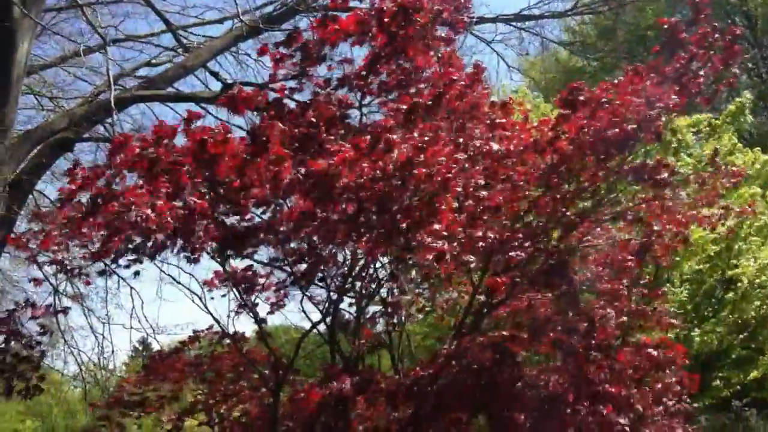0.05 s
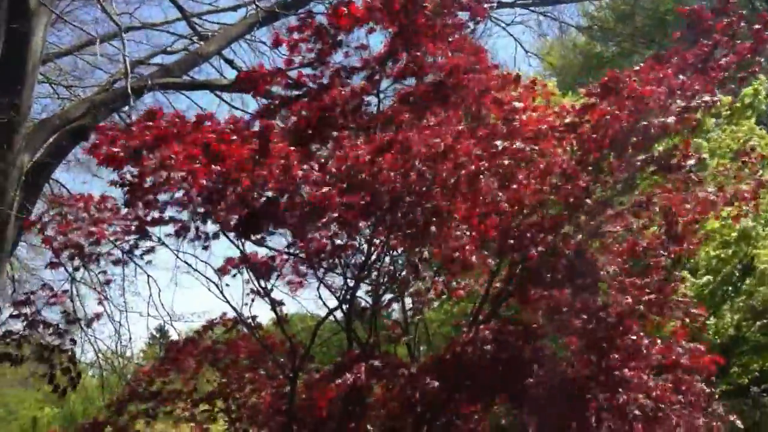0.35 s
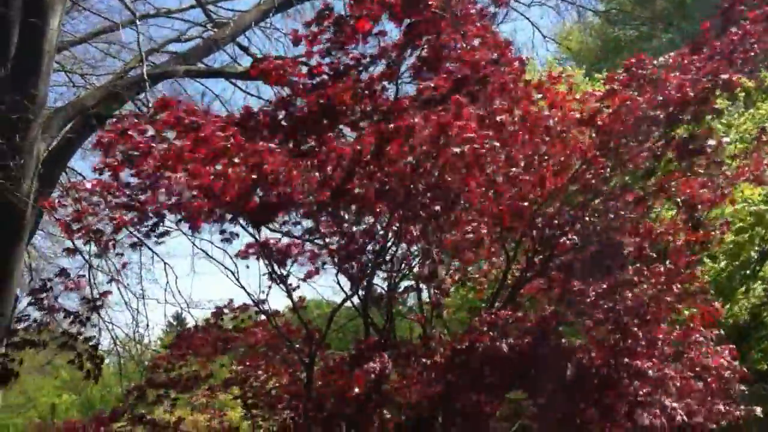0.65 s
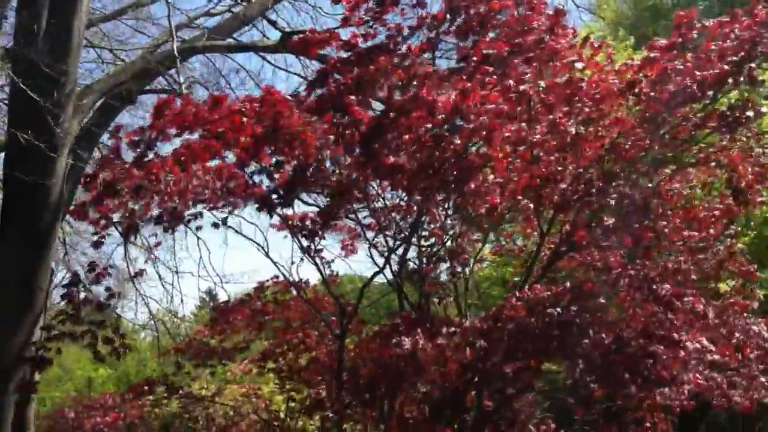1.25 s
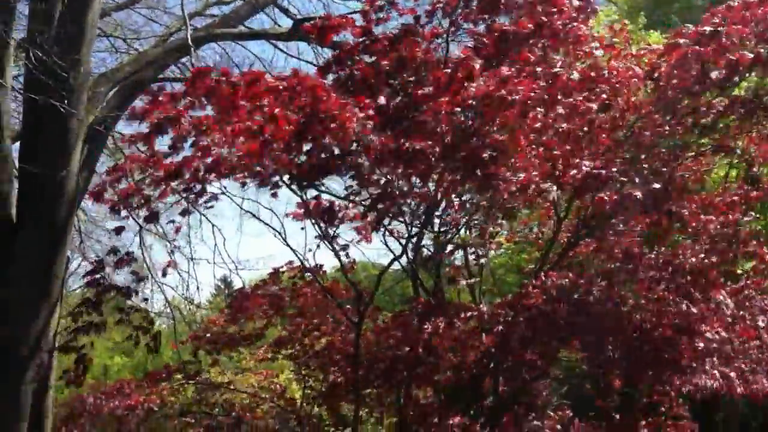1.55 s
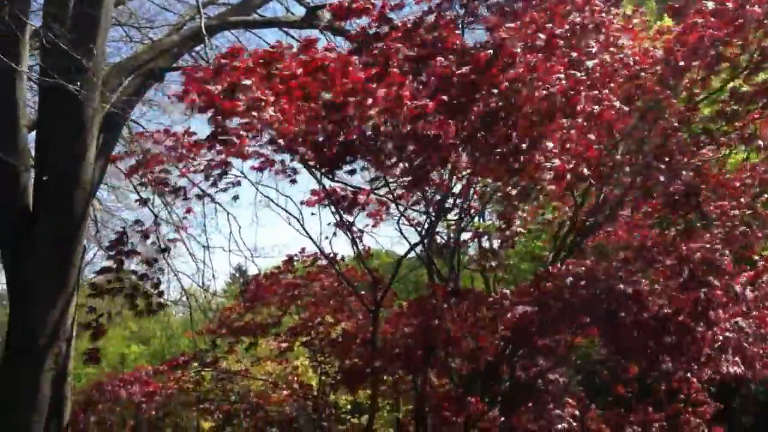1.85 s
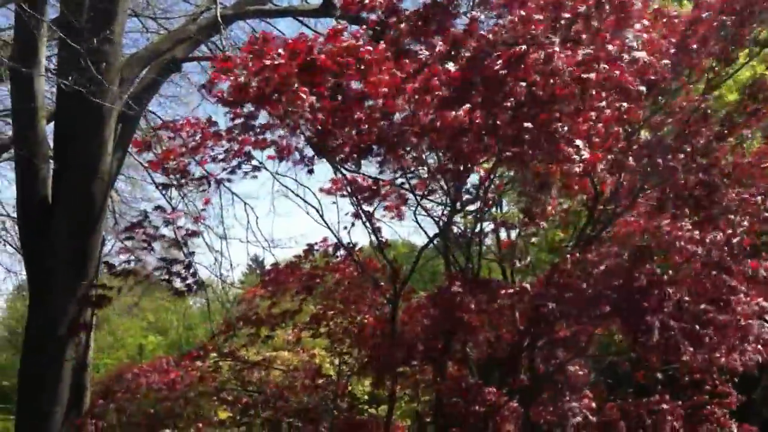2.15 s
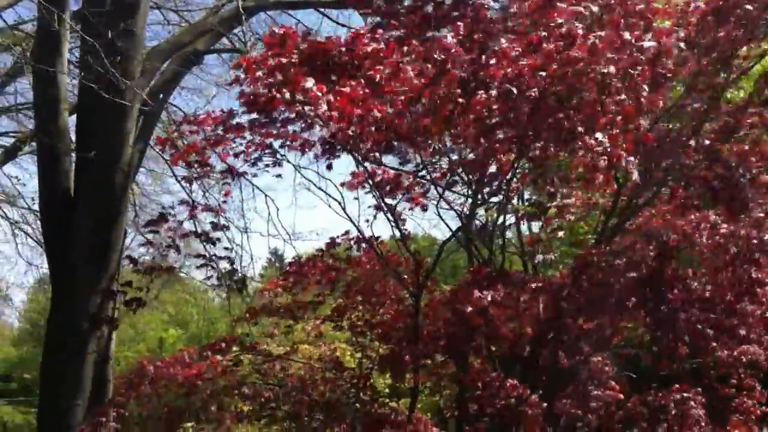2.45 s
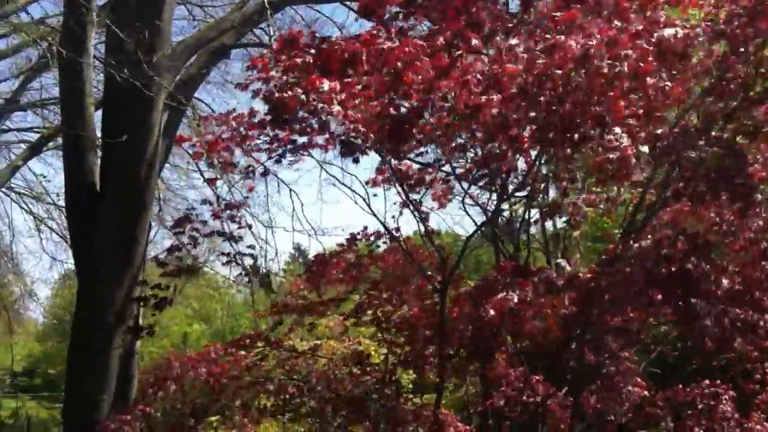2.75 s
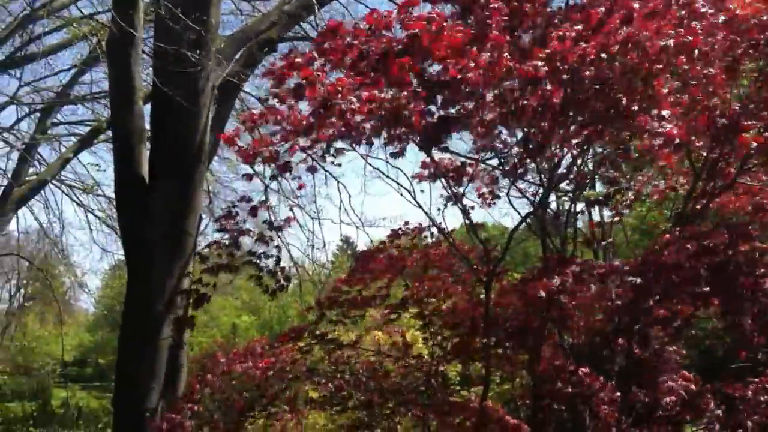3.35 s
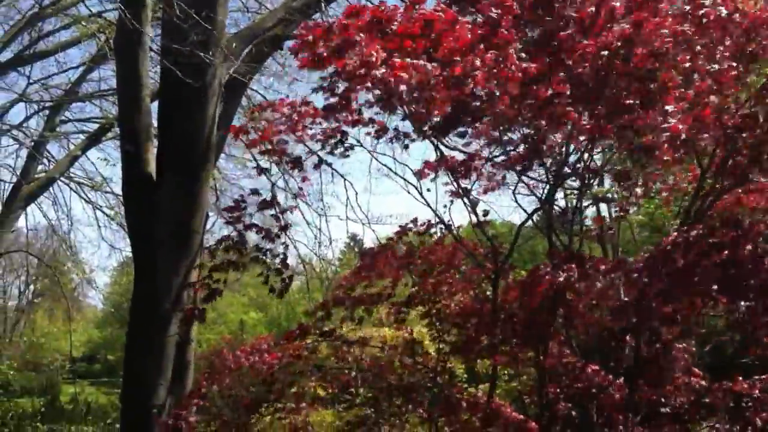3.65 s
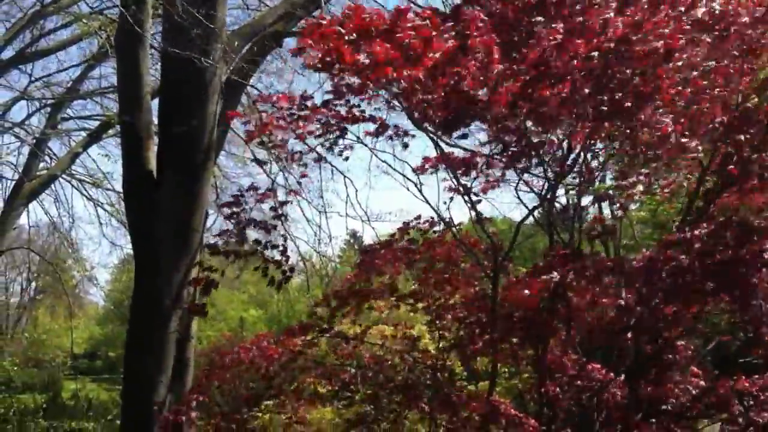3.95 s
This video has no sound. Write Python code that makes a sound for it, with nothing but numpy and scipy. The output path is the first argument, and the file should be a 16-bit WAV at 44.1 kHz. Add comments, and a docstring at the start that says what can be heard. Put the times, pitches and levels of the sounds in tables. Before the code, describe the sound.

Wind rumbles and thumps on the microphone beside a tree, easing into soft puffs.

```python
"""Wind buffets a camera's microphone beside a leafy tree: one hard gust, then light puffs.
The flow rumbles in the microphone's port and crackles when it runs fast.
Single eddies strike the port as soft bumps, each a short swirl leading into a pressure kick.
Behind the wind lie a steady distant rush, a thin hiss of leaves and a few faint treble flickers."""
import sys
import numpy as np
from scipy.fft import rfft, irfft, next_fast_len
from scipy.io import wavfile
from scipy.ndimage import map_coordinates

SR = 44100
rng = np.random.default_rng(int(sys.argv[2]) if len(sys.argv) > 2 else 0)


def wrap_up_sound(samples):
    """Save the sound to the file named by the first command line argument, as 16-bit audio."""
    columns = np.atleast_2d(samples).T
    # keep every value between -1 and 1, then stretch to whole-number steps
    tamed = np.clip(columns, -1, 1)
    steps = np.round(tamed * 32767).astype(np.int16)
    wavfile.write(sys.argv[1], SR, steps)


N = 176400  # 4 s

# Level ride of the rumble: the hard gust, then the light puffs (time [s], level [dB])
GUST_RIDE = [(0, -32), (.05, -22), (.13, -20.5), (.2, -22), (.3, -16), (.355, -20), (.38, -28),
             (.40, -25.5), (.45, -25.5), (.5, -29), (.565, -45), (.63, -43), (.69, -42), (.75, -33),
             (.785, -40.5), (.85, -33.5), (.89, -46.5), (.965, -37), (1.0, -46.5), (1.2, -57)]
PUFF_RIDE = [(1.6, -58), (1.7, -44.5), (1.82, -46.5), (1.89, -64), (2.0, -45.5), (2.33, -55.5),
             (2.41, -29.5), (2.46, -39), (2.54, -49), (2.65, -38), (2.77, -30.5), (2.83, -46.5),
             (2.97, -41.5), (3.07, -55.5), (3.17, -38), (3.24, -40), (3.33, -57), (3.51, -37.5),
             (3.67, -63), (4, -52)]
# Tone of the boomy rumble and of the midrange crackle (frequency [Hz], relative level [dB])
RUMBLE_TONE = [(20, -34.5), (45, -39), (65, -24), (90, -16), (125, -1), (175, 2.5), (240, -6.5),
               (330, -14.5), (450, -21), (700, -43.5), (1200, -73), (3000, -100)]
CRACKLE_TONE = [(60, -40), (250, -8), (550, 13), (750, -3), (1400, -18), (2100, -36), (2800, -37),
                (6000, -79)]
FLUTTER_DB, FLUTTER_RATE = 3, 40  # quick unevenness of the flow: depth, knots a second
FAST_FLOW_DB, CRACKLE_DB, CRACKLE_SLOPE = -19, -32.5, 4.3  # fast flow, crackle there, dB per dB of flow


def buffeting():
    """The flow rumbles in the port; a crackle grows steeply with its speed."""
    flow_db = curve(GUST_RIDE + PUFF_RIDE)
    rumble = amp(flow_db + FLUTTER_DB * wobble(FLUTTER_RATE)) * noise(RUMBLE_TONE)
    crackle = unit(amp(2.5 * wobble(rate=168.5)) * noise(CRACKLE_TONE))
    crackle_db = CRACKLE_DB + CRACKLE_SLOPE * (flow_db - FAST_FLOW_DB)
    return rumble + amp(crackle_db) * crackle


# Eddy hits on the port; sharper ones sound brighter (time [s], kick peak [dB], sharpness [Hz])
EDDY_HITS = [(.083, -15, 400), (0.094, -8, 330), (0.129, -15, 89), (0.151, -1, 273), (0.178, -14, 258),
             (.222, -10, 398), (.228, -2, 550), (.238, -6.5, 1680), (.247, -8.5, 400), (.264, -4.5, 376),
             (0.276, -11.5, 480), (0.29, -4, 600), (.298, 1.5, 133), (.317, -9.5, 450), (.326, -7.5, 800),
             (.342, -2.5, 370), (0.35, -8.5, 1050), (0.373, -16.5, 160), (.440, -9.5, 200),
             (0.489, -10.5, 170), (0.649, -14.5, 196), (.702, -26.5, 150), (.752, -22, 140),
             (1.80, -29.5, 80), (1.98, -34.5, 80), (2.133, -25, 90), (2.391, -19.5, 183),
             (2.400, -16.5, 122), (2.649, -25, 70), (2.752, -19.5, 129), (2.779, -29, 80),
             (2.98, -26.5, 59), (3.52, -27.5, 109)]
EDDY_KNEE_HZ, SWIRL_LOW_CUT_HZ = 230, 330  # a hit rolls off above the knee; its swirl has no bass
SWIRL_DB, SWIRL_RISE_S, SWIRL_FALL_S = -9.5, 0.0049, 0.0021  # swirl trim against the kick, attack, decay


def eddies():
    """Each eddy is a turbulent swirl that builds up to one pressure kick on the port."""
    out = np.zeros(N)
    for time_s, peak_db, sharp_hz in EDDY_HITS:
        colour = lambda hz: np.exp((EDDY_KNEE_HZ - np.hypot(hz, EDDY_KNEE_HZ)) / sharp_hz) * port(hz)
        impulse = np.arange(N) == round(time_s * SR)
        kick = filtered(impulse, colour)
        churn = rng.standard_normal(N) * swell(time_s, SWIRL_RISE_S, SWIRL_FALL_S)
        swirl = filtered(churn, lambda hz: colour(hz) * hz ** 2 / (hz ** 2 + SWIRL_LOW_CUT_HZ ** 2))
        swirl /= np.linalg.norm(kick)  # cancels the gain that the colour gives to noise
        out += amp(peak_db) * (kick / np.abs(kick).max() + amp(SWIRL_DB) * swirl)
    return out


# The port's EQ on the eddy hits (frequency [Hz], gain [dB])
PORT_EQ = [(200, 0), (340, 0), (560, 1.5), (780, -4.5), (1450, -4), (2150, -8.5), (2750, -15.5),
           (3500, -15.5), (5000, -18)]
PORT_LOW_CUT_HZ, PORT_Q, PORT_HIGH_CUT_HZ = 160, 1.7, 3900


def port(hz):
    """The microphone port's response: a steep ringing bass cut, uneven mids and a soft top."""
    low, high = 1j * hz / PORT_LOW_CUT_HZ, 1j * hz / PORT_HIGH_CUT_HZ
    ringing_cut = low ** 2 / (low ** 2 + low / PORT_Q + 1)
    damped_cut = low ** 2 / (low ** 2 + np.sqrt(2) * low + .5)
    soft_top = 1 / (high ** 2 + np.sqrt(2) * high + 1) ** 2
    return ringing_cut * damped_cut * amp(along(PORT_EQ, hz)) * soft_top


# Tone of the distant bed (frequency [Hz], relative level [dB])
RUSH_TONE = [(20, -43), (45, -28), (80, -7.5), (140, -2), (300, 0), (450, -1.5), (650, -4), (950, -3),
             (1400, -6.5), (1900, -12), (2700, -20.5), (5000, -67)]
RUSH_DB = -46.5


def distant_rush():
    """A steady, dark rush from far off that barely wavers."""
    return amp(RUSH_DB + 0.13 * wobble(rate=6)) * noise(RUSH_TONE)


# Tone of the leaves (frequency [Hz], relative level [dB])
LEAF_TONE = [(500, 3), (2500, -3), (3400, 2), (4200, 0), (5100, 1.5), (6300, -1.5), (8300, -2),
             (10000, -4.5), (12500, -4.5), (15500, -7.5)]
# Level ride of the leaves (time [s], level [dB])
LEAF_RIDE = [(0, -55.5), (.13, -53.5), (.4, -56.5), (1, -54.5), (1.6, -55.5), (2.4, -55), (2.85, -54),
             (3.4, -55), (4, -56)]


def leaf_hiss():
    """Leaves in the wind give a thin hiss with a slight shimmer."""
    return amp(curve(LEAF_RIDE) + 0.36 * wobble(rate=25.4)) * noise(LEAF_TONE)


# Treble flicker cues (time [s], level [dB], centre [Hz], half length [s], spread [octaves])
FLICKER_CUES = [(1.037, -56, 6000, 0.0055, .6), (1.781, -49.5, 4400, 0.0086, .55),
                (1.79, -59, 14000, 0.0074, .14), (1.855, -59, 14000, .012, .16),
                (2.364, -53.5, 12500, .012, 0.54), (2.50, -55, 13500, 0.016, 0.4),
                (2.89, -59, 3500, 0.017, 0.44)]


def treble_flickers():
    """Faint, brief flickers of hiss: most are broad, two are thin, very high and narrow-band."""
    out = np.zeros(N)
    for time_s, level_db, centre_hz, half_s, octaves in FLICKER_CUES:
        band = lambda hz: np.exp(-.5 * (np.log2((hz + 1) / centre_hz) / octaves) ** 2)
        hiss = unit(filtered(rng.standard_normal(N), band))
        out += amp(level_db) * swell(time_s, half_s, half_s) * hiss
    return out


def amp(db):
    """Decibels to gain."""
    return 10 ** (np.asarray(db) / 20)


def unit(x):
    """x at rms 1."""
    return x / np.sqrt(np.mean(x ** 2) + 1e-20)


def curve(ride):
    """A (time [s], level [dB]) ride as one level per sample."""
    return np.interp(np.arange(N) / SR, *np.transpose(ride))


def along(tone, hz):
    """The level at hz of a (frequency [Hz], level [dB]) curve, on a log frequency axis."""
    points_hz, db = np.transpose(tone)
    return np.interp(np.log(hz + 1), np.log(points_hz), db)


def wobble(rate):
    """Smooth random modulation, rate knots a second."""
    knots = rng.standard_normal(int(N * rate / SR) + 4)
    return map_coordinates(knots, [np.arange(N) * rate / SR])


def swell(peak_s, rise_s, fall_s):
    """A bell-shaped envelope that reaches 1 at peak_s."""
    t = np.arange(N) / SR - peak_s
    return np.exp(-.5 * (t / np.where(t < 0, rise_s, fall_s)) ** 2)


def filtered(x, response):
    """x through a filter given as a complex response of frequency."""
    size = next_fast_len(N + SR // 4)
    return irfft(rfft(x, size) * response(np.fft.rfftfreq(size, 1 / SR)), size)[:N]


def noise(tone):
    """Noise of rms 1, shaped by a tone curve."""
    return unit(filtered(rng.standard_normal(N), lambda hz: amp(along(tone, hz))))


def scene():
    """The mono mix: wind on the port up front; rush, leaves and flickers behind."""
    return (buffeting() + eddies() + distant_rush() + leaf_hiss() + treble_flickers())[None]


def record(dry, band_limit_hz=15780):
    """The camera soft-clips peaks near full scale and keeps nothing above its band limit."""
    soft_clipped = dry[0] / (1 + dry[0] ** 8) ** (1 / 8)
    return filtered(soft_clipped, lambda hz: hz < band_limit_hz)[None]


dry = scene()
out = record(dry)
wrap_up_sound(out)
```